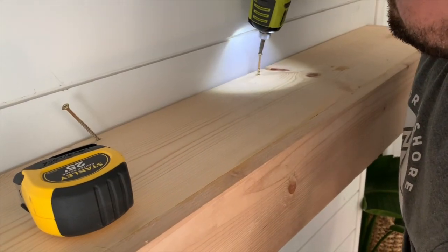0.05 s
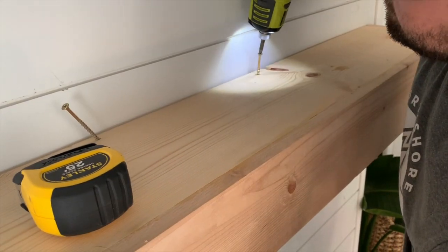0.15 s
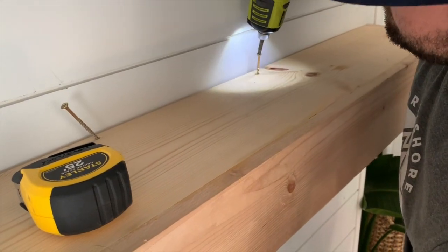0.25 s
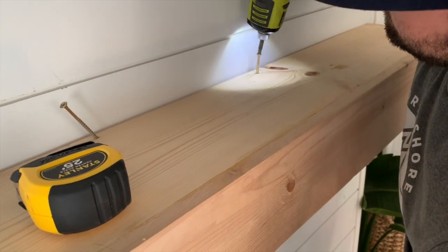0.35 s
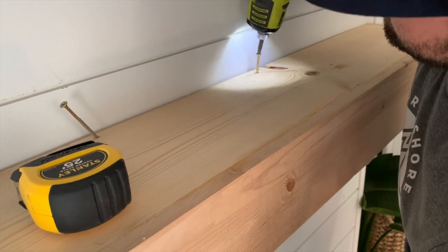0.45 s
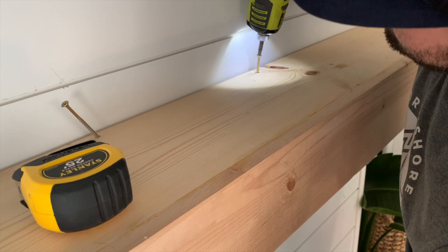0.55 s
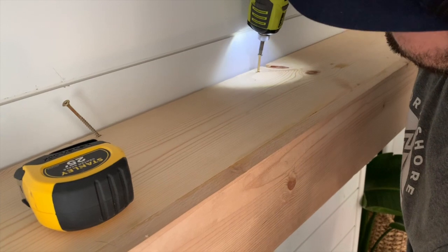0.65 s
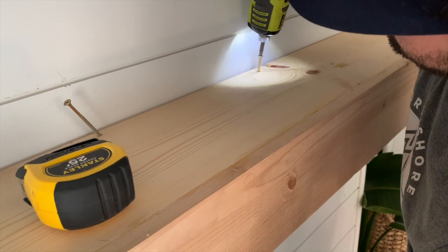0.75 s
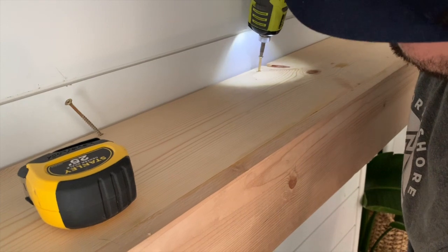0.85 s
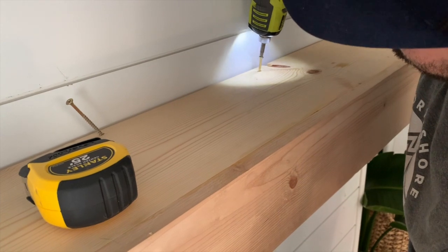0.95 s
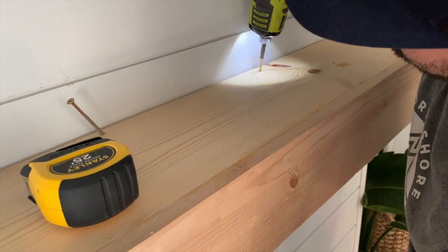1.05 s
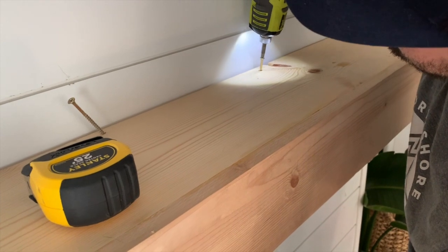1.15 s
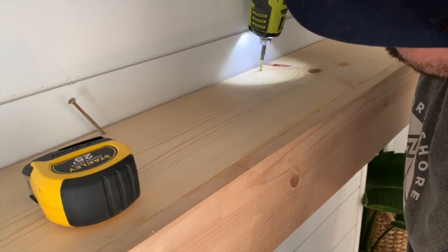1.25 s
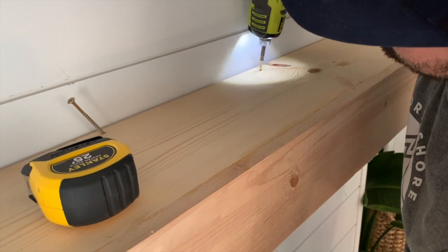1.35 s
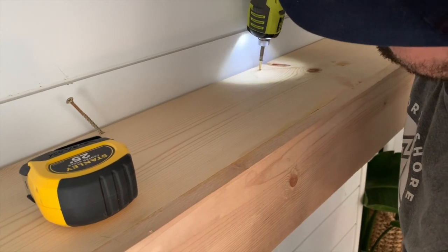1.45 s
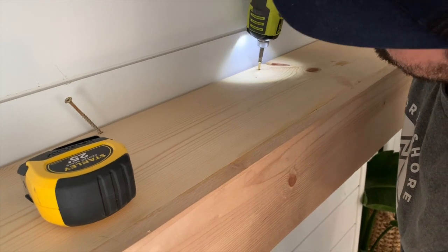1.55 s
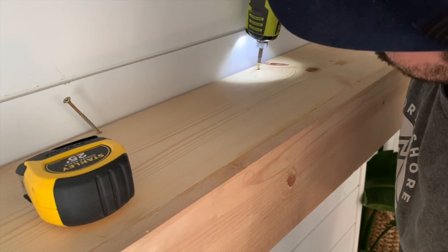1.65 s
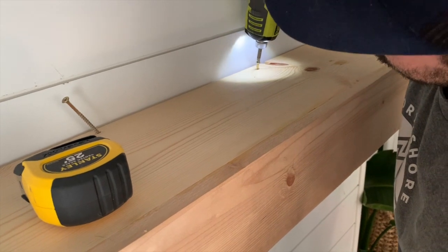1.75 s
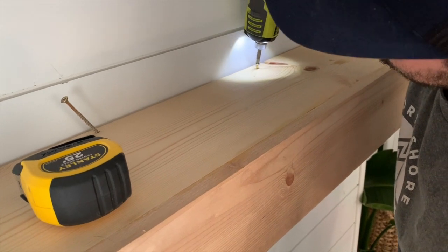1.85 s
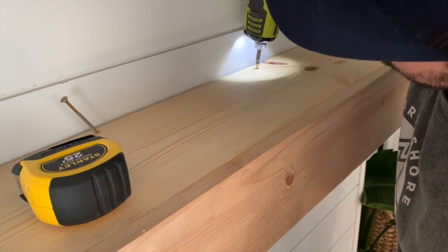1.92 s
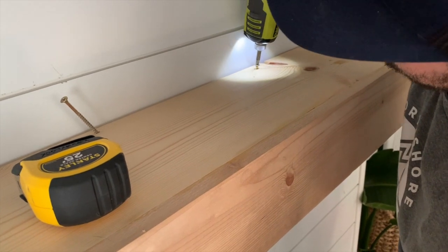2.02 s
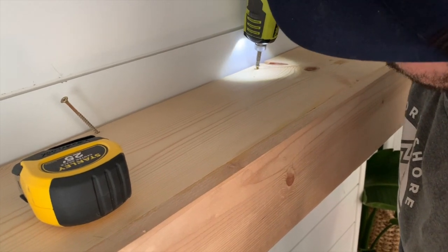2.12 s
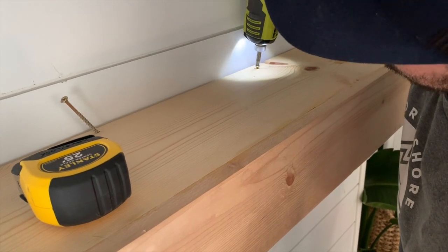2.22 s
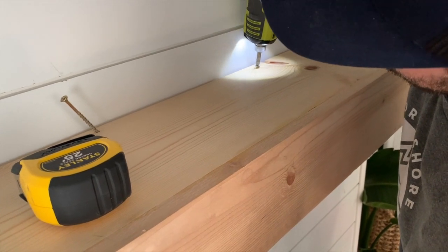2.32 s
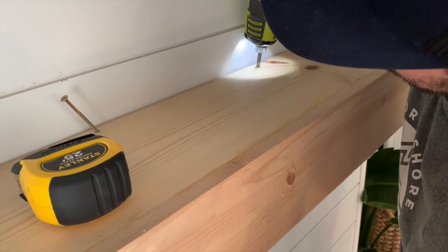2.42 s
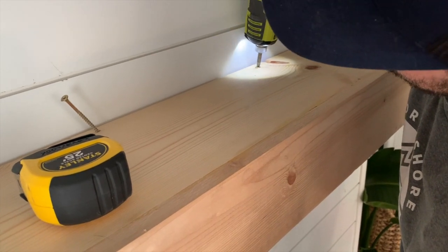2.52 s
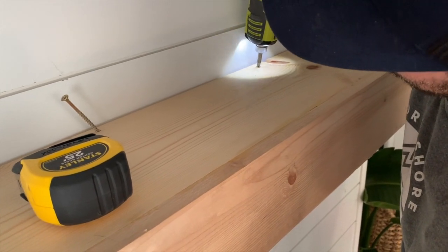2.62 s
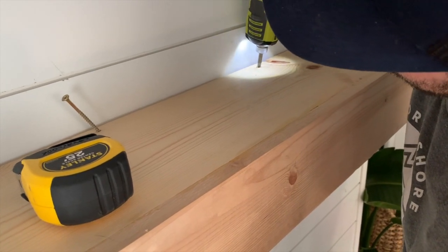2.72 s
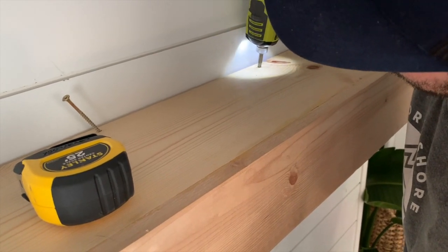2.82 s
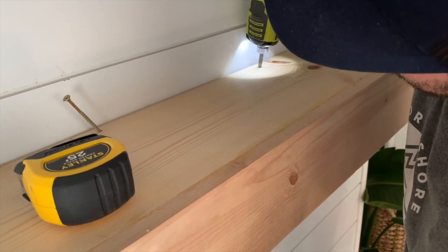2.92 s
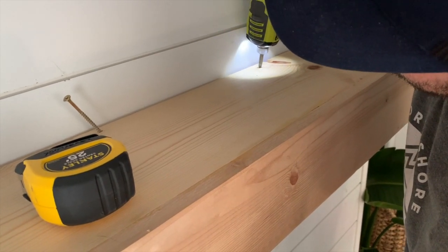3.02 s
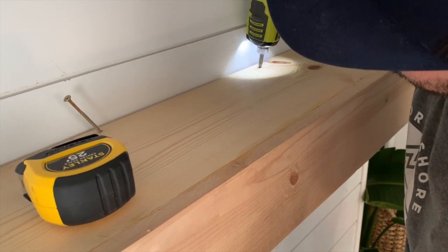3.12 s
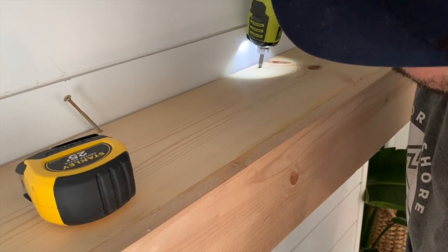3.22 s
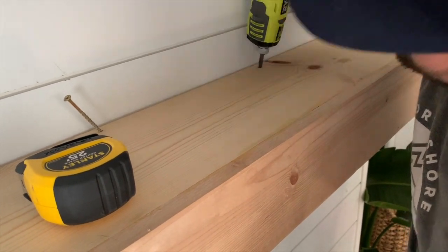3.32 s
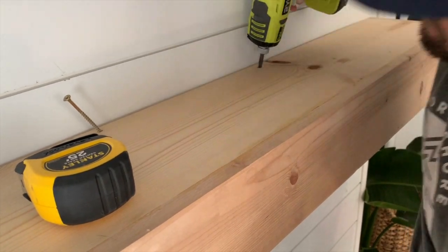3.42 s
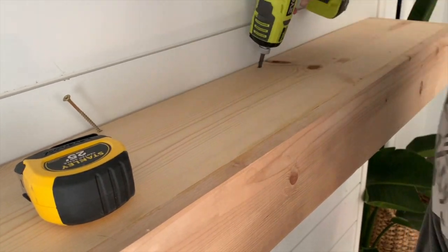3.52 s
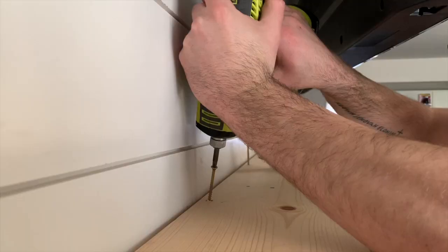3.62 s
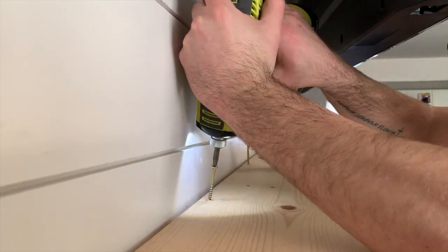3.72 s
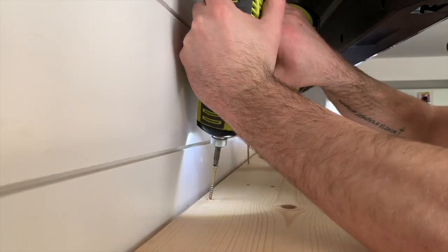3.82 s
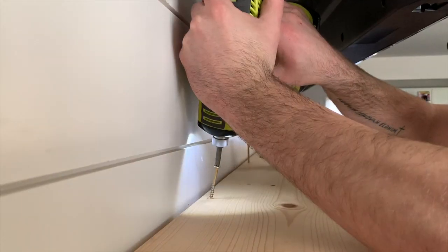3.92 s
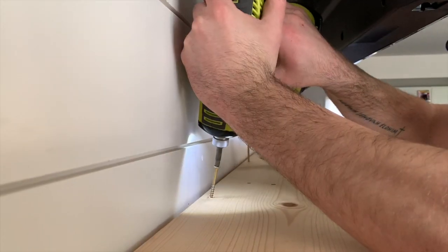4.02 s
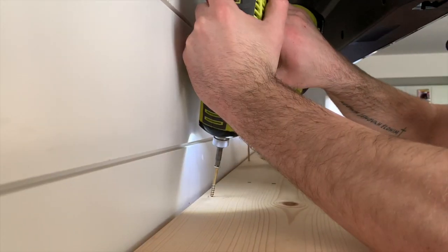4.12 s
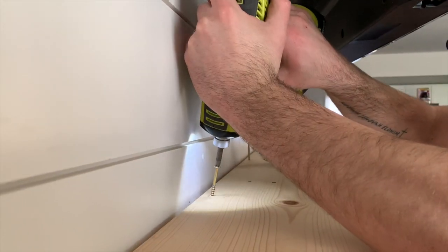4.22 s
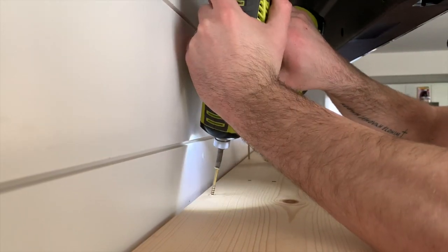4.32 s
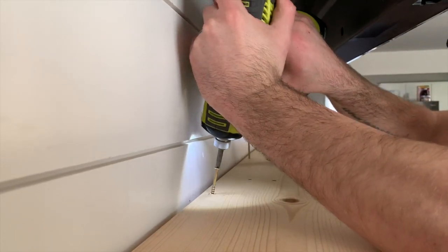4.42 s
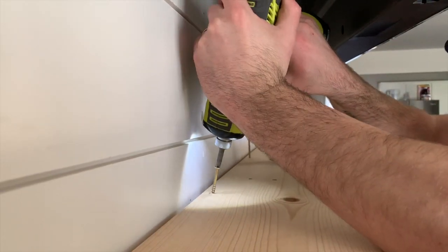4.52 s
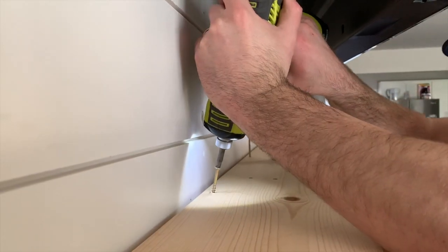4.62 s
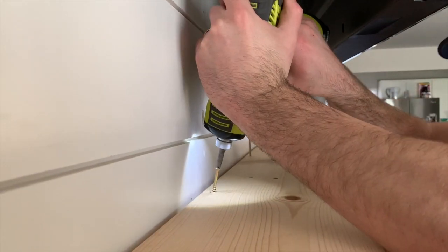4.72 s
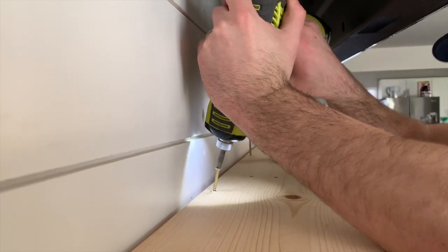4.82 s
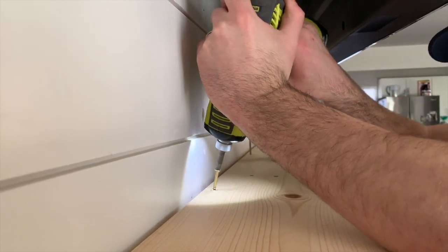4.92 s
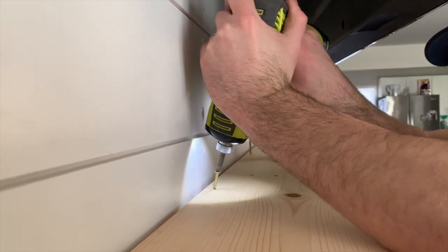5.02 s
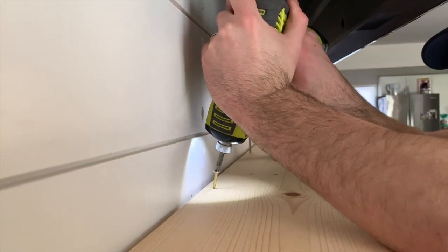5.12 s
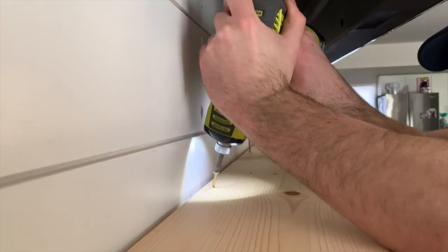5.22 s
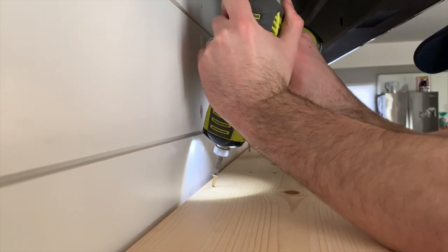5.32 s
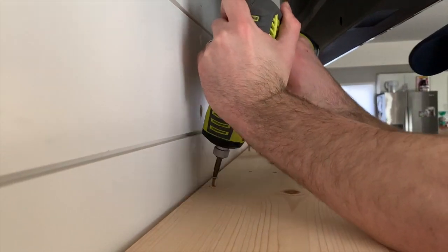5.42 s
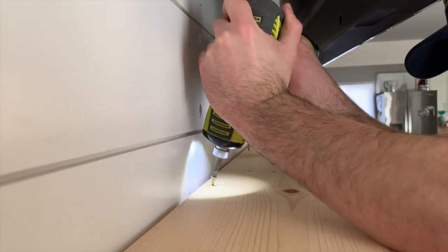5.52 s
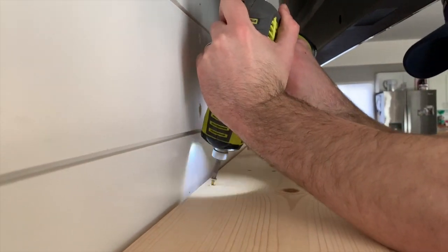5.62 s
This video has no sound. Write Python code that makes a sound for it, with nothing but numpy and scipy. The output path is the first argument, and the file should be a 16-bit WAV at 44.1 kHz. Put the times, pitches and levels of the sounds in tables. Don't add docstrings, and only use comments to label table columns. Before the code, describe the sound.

Stereo indoor recording of power-tool work on a thick shelf. First a slightly distant driver: steady gear hiss, dry woody creaking, irregular bit knocks, faint taps, then about ten hard hammer blows with dull echoing followers, louder at the end. It stops; hands and cloth brush the plank and plastic clicks. Then a nearer driver growls in separate trigger pulls, slow and labouring at first, later spinning up quickly over a low board hum.

```python
import sys
import numpy as np
from scipy import signal
from scipy.fft import rfft, irfft, next_fast_len
from scipy.io import wavfile
from scipy.ndimage import uniform_filter1d

SR = 44100
rng = np.random.default_rng(int(sys.argv[2]) if len(sys.argv) > 2 else 0)


def invert_db(x):
    u = np.asarray(x, float) / 20
    return 10 ** u


def log_audio(samples):
    frames = np.atleast_2d(samples).T
    limited = np.clip(frames, -1, 1)
    pcm = np.round(limited * 32767).astype(np.int16)
    wavfile.write(sys.argv[1], SR, pcm)


N = 249606

# start_s, motor_db, thread_bite_db
FAR_RUN = [(0.0, -34.5, -14.5), (0.3, -39.5, -28.5), (0.46, -34, -24.5), (0.53, -37.5, -19.5),
           (0.95, -39, -21.5), (1.27, -38, -30), (1.8, -35.5, -27), (2.0, -36, -27.5), (2.2, -35, -27.5),
           (2.4, -35.5, -25), (2.55, -36, -29.5), (2.7, -36, -25.5), (2.9, -34.5, -28), (3.05, -37.5, -14),
           (3.16, -41.5, -19.5), (3.26, -52, -21)]
# on_s, load_s, off_s, idle_db, loaded_db
WHINE = [
    (3.675, 3.83, 4.05, -57, -52),
    (4.38, 4.525, 4.88, -52, -42),
    (5.09, 5.14, 5.17, -53, -48),
]
# start_s, peak_db, ring_hz, ring_db, length_s
CLICKS = [(3.312, -42.5, 11500, -13, .004), (3.575, -56, 3800, -14, 0.0092),
          (3.594, -46.5, 10500, -8, 0.068), (3.633, -60, 7670, 4, .025), (3.665, -56, 2500, -15, .006),
          (3.697, -46, 1500, -14, 0.018), (3.715, -51.5, 1700, -18, .012), (3.781, -56, 3720, -7, .008),
          (3.797, -54, 2000, -10, .01), (3.805, -64, 3700, 0, 0.018), (3.844, -38, 2400, -20, .006),
          (4.523, -37.5, 2110, -22, .004), (5.138, -24, 3260, -17, 0.005),
          (5.489, -17.5, 2900, -13, 0.0074)]
# mode_hz, level_db, t60_s
BOARD = [(49.6, -1.5, 0.15), (78.4, -2, 0.24), (96.3, -0.5, 0.15), (171.3, 4, 0.1), (227.2, -3.5, 0.38),
         (268.3, 3, 0.064), (359, 3.5, 0.031), (459.8, -2, 0.045), (474.8, -3.5, 0.053),
         (561.7, -16, 0.076), (712.5, -14.5, 0.04), (892, -11, 0.015), (1108, -26, 0.12),
         (1286, -14.5, 0.028)]
# mode_hz, level_db, t60_s
STEEL = [(1750, -15, 0.013), (2489, 0.5, 0.015), (2381, -8.5, 0.046), (3780, -18, 0.0031),
         (6840, 12, 0.0028)]
# freq_hz, density_db
FAR_HISS = [(300, -10.5), (600, 0), (1500, -11), (2800, -27.5), (3200, -7.5), (5000, -8.5), (7000, -3.5),
            (9000, -2.5), (12000, -6.5), (15700, -7), (15900, -79.5)]
NEAR_HISS = [(250, -44), (450, -43), (1500, -8.5), (2600, -4.5), (3500, 1.5), (5000, -6), (7500, -1.5),
             (10000, -6.5), (13000, -7), (15700, -9), (15900, -72)]
# peak_hz, width_hz, level_db
FAR_HOUSING = [(2565, 200, 7.5), (3740, 120, -8.5), (4440, 140, -6), (5270, 110, -5.5), (6220, 250, -1.5),
               (7030, 110, -5)]
NEAR_HOUSING = [(700, 280, 17.5), (1003, 45, 8), (1390, 18, -5), (1810, 15, -9.5), (2020, 265, 16.5),
                (2765, 67, 2), (3720, 14, -14), (4400, 84, 2.5), (7010, 44, 7)]
# freq_hz, density_db
AIR = [(18, -27), (30, 8.5), (229, -6.5), (497, -39.5), (1500, -41), (3260, -39.5), (5500, -43),
       (7270, -48), (8660, -54), (10600, -46.5), (12000, -58), (15600, -92), (22000, -120)]
# freq_hz, t60_s
ROOM_T60 = [(60, 0.98), (300, 0.22), (1500, 0.49), (6000, 0.17), (14000, 0.16)]
# freq_hz, level_db
WALL_DB = [(60, -11), (300, -5), (1200, 6.5), (4000, 2), (7000, -0.5), (15000, -9)]
# freq_hz, lean_db
FAR_LEAN = [(60, -0.5), (150, 0), (380, 3), (950, 6), (2380, 1.5), (5980, -5), (15000, 3.5)]
NEAR_LEAN = [(60, 12.5), (150, -2.5), (380, 9.5), (950, 4), (2380, 3.5), (5980, -2.5), (15000, 3.5)]
# freq_hz, lead_rad
PORT_LEAD = [(0, 0), (700, .9), (5900, 1.4), (8450, -3.14), (15800, -12.57), (22050, -20.6)]
# start_s, rustle_db, bumps_db
HANDLING = [(3.24, -43, -32), (3.3, -43, -38), (3.41, -48, -30.5), (3.48, -60.5, -59), (3.6, -72, -55),
            (3.68, -67, -54), (3.7, -62, -42), (3.716, -60, -34), (3.74, -75, -37), (3.775, -75.5, -55),
            (3.79, -68, -55), (3.84, -82, -60)]
# low_hz, high_hz
SUM_GAPS = [(8250, 9050), (12700, 14200)]
DIFFERENCE_GAPS = [(10350, 11850), (15100, 17000)]
HARD_BLOWS_S = [.075, .16, .915, 1.208, 2.595, 3.103, 3.203, 4.41, 5.13]
DRY_WOOD_S = (1.1, 1.4, 2.4, 2.801)
# start_s, mesh_aim_hz, current_db (-84 or less: let go)
TRIGGER = [(3.846, 239.6, -5.5), (3.964, 250.1, -2.5), (4.075, 222.4, -9), (4.166, 300.2, -2),
           (4.215, 347, 3.5), (4.295, 445, 1), (4.375, 199.1, -90), (4.54, 222.3, -4), (4.64, 242.2, -2.5),
           (4.73, 220.9, -2.5), (4.815, 573.7, 3), (5.036, 248, -102), (5.135, 349, 2.5), (5.175, 680.4, 3),
           (5.343, 617.5, 1), (5.4, 247.5, -90), (5.488, 347.5, 8), (5.503, 700, 3), (5.61, 525, -84)]
# start_s, peak_db, crack_db
SLIPS = [(0.074, 5, -8), (0.197, -10.5, -44.5), (0.267, -12.5, -24), (0.366, -20, -42), (0.481, -16.5, -10),
         (0.577, 2.5, -14.5), (0.745, 1.5, -9.5), (0.821, -27, -37), (0.917, 2.5, -10), (0.985, -16.5, -24),
         (1.14, -18, -18.5), (1.21, 6.5, -8.5), (5.013, -12.5, -36.5), (5.599, -8.5, -22),
         (5.627, -6.5, -19.5)]
# start_s, peak_db
TAPS = [(1.313, -21), (1.398, -36), (1.459, -33), (1.562, -17), (1.622, -30), (1.695, -39), (1.773, -15),
        (1.889, -20), (1.944, -43), (2.049, -12.5), (2.104, -18)]
# start_s, peak_db, crack_db, follower_lag_s, follower_db
BLOWS = [(2.237, -9.5, -19, 0.055, -6), (2.362, -10.5, -17.5, 0.055, -7), (2.491, -10, -25, .030, -5.5),
         (2.594, -3, -13.5, .036, -4.5), (2.705, -7, -13.5, 0.031, -5.5), (2.814, -2.5, -18, 0.027, -15),
         (2.901, -2, -17.5, 0.015, -25), (3.006, 5.5, -5.5, 0.019, -21), (3.104, 4, -4, 0.011, -32.5),
         (3.204, -2.5, -11.5, 0.0063, -43)]
# start_s, peak_db, crack_db
TICKS = [(1.8, -26, -29.5), (1.856, -41, -28), (2.4, -12, -27.5), (2.014, -26, -32.5), (2.088, -10.5, -36),
         (2.4, -16.5, -34), (2.199, -14, -35), (1.4, -14, -39), (2.335, -6, -32), (1.9, -4.5, -38),
         (1.9, -14.5, -22.5), (3, -21, -35), (0.68, -15, -24), (1.1, -22.5, -19.5), (2.3, -10, -28),
         (2.3, -13, -25), (2.5, -13, -18), (2.83, -9.5, -29), (0.06, -5, -28), (2.925, -11, -29),
         (4.2, -19, -31), (2.98, -12.5, -23), (2.993, -8, -35), (0.48, 1, -12)]
# mesh_multiple, level_db
MESH_ORDERS = [(1, -13), (2, 3), (3, -2), (4, -3), (5, -5), (6, -3), (7, -10), (8, -9)]
# freq_hz, lift_db
SHELL_LIFT = [(300, -3), (560, -2), (720, 5), (830, -1), (950, 6), (1250, 1), (1700, 4), (2200, 2),
              (2900, -8), (4100, 2)]
# mesh_multiple, level_db against the motor
FAR_WHISTLES = [(4, -15), (5, -17), (8, -16), (9, -13)]
WHISTLE_S = (1.3, 1.5, 2.3, 2.5)

FAR_MESH_HZ, FAR_MESH_DB, FAR_MESH_DB_PER_S = 284.3, -1.5, -7
MESH_WANDER_DB, WHISTLE_LIFT_DB = 1.5, 6
DRY_WOOD_DB, SOFT_WOOD_DB = 22, -2
CAM_SWING, CAM_LAG_S = .06, .005

TAP_CRACK_DB, FOLLOWER_CRACK_DB, REBOUND_S = -25.5, -45, .0095
SNAP_DB, SNAP_FOLLOWS, SEATED_S, SEATED_SNAP_DB = -41.5, 0.96, 3.05, 7.5
THUD_T60_S, THUD_KNEE_HZ, THUD_DAMPING = 0.15, 393, 1.2
SEATED_HARD_DB, HARD_FROM_S = 3.5, 2.85
BURIED_S, BURIED_DB = 2.2, -7
RATTLE_SHARE, BODY_DB = 0.21, 15
SECOND_SCREW_S = 3.6

SLOW_HZ, SPIN_S = 240, .025
PULL_S, CURRENT_S = 0.015, 0.017
HISS_DB, HISS_DB_PER_OCT = -30.5, 4
MESH_DB, MESH_DB_PER_OCT = -18.5, -11
ORDERS_DB, ORDERS_DB_PER_OCT = -41, 5
THREAD_DB, THREAD_DB_PER_S, THREAD_DB_PER_OCT = -46.5, 9.5, 2
SWEEP_LOSS_DB = 1.5
IDLE_HZ, LOADED_HZ, SAG_S, OCTAVE_DB = 7165, 6930, .03, -10

HUM_DB, HUM_HZ, MESH_PER_SHAKE, HUM_IDLE_DB = -20, 57, 9.8, -43
HUM_FROM_HZ, HUM_DB_PER_OCT, PAST_DB_PER_OCT, HUM_RING_S = 516, 78, -19.5, 0.024
SHAKE_WANDER_DB = 3.5

AIR_DB, NEAR_ROOM_DB = -38, -17
GAP_SHRINK_HZ, GAP_FLICKER_PER_S = 220, 9


def rms_one(x):
    return x / np.sqrt(np.mean(x ** 2) + 1e-20)


def in_time(rows, fade=0.0093):
    s, *columns = np.transpose(rows)
    t = np.arange(N) / SR
    gate = np.clip(np.minimum(t - s[0] + fade, s[-1] + fade - t) / fade, 0, 1)
    return [gate] + [np.interp(t, s, c) for c in columns]


def at_hz(points, hz):
    point_hz, point_value = np.transpose(points)
    return np.interp(np.log(hz + 1), np.log(point_hz), point_value)


def colour(x, spectrum):
    gain = invert_db(at_hz(spectrum, np.fft.rfftfreq(N, 1 / SR)))
    return rms_one(irfft(rfft(x) * gain, N))


def drift(rate):
    r = np.exp(-64 * np.pi * rate / SR)
    noise = rng.standard_normal(N // 32 + 2002)
    slow = signal.lfilter([1], [1, -2 * r, r * r], noise)[2000:]
    return np.interp(np.arange(N) / 32, np.arange(len(slow)), rms_one(slow))


def lagged(x, lag_s):
    r = np.exp(-1 / (lag_s * SR))
    return x[0] + signal.lfilter([(1 - r) ** 2], [1, -2 * r, r * r], x - x[0])


def ring(x, hz, t60):
    r, w = 10 ** (-3 / (t60 * SR)), 2 * np.pi * hz / SR
    return signal.lfilter([0, np.sin(w)], [1, -2 * r * np.cos(w), r * r], x + 1e-18)


def tone(hz, wobble):
    return np.sqrt(2) * np.sin(2 * np.pi * np.cumsum(hz * (1 + wobble * drift(23.2))) / SR)


def grains(per_s, spread_db):
    hits = rng.random(N) < per_s / SR
    size = invert_db(spread_db * np.minimum(rng.exponential(1, N), 4))
    return hits * size * rng.choice([-1, 1], N)


def jolts(at_s, level_db, length_s, rise_s):
    t, out = np.arange(SR // 5) / SR, np.zeros(N + SR)
    for s, db, length in zip(at_s, level_db, length_s):
        shape = (1 - np.exp(-t / rise_s)) * np.exp(-(t / max(length, .002)) ** 2)
        start = round(s * SR)
        out[start:start + len(t)] += invert_db(db) * shape / np.sqrt(length)
    return out[:N]


def housing(x, peaks, widen, peak_db, patchy_db):
    lifted = 0
    for hz, width, db in peaks:
        grip = invert_db(db + patchy_db * drift(8.2))
        lifted = lifted + grip * rms_one(ring(x, hz, 2.13 / (width * widen)))
    return rms_one(lifted) * invert_db(peak_db)


def board(force):
    return sum((-1) ** k * invert_db(db) * ring(force, hz, t60) for k, (hz, db, t60) in enumerate(BOARD))


def gears(spectrum, peaks, flutter_db, peak_db):
    teeth = rng.standard_normal(N) + .5 * grains(per_s=1300, spread_db=3.5)
    teeth = teeth * invert_db(flutter_db * (drift(27.0) + 0.089 * drift(76)))
    shell = housing(teeth, peaks, widen=2.66, peak_db=peak_db, patchy_db=1.5)
    return rms_one(colour(teeth, spectrum) + shell)


def cam():
    first_slips = SLIPS[:12]
    s = np.sort([row[0] for row in first_slips + TAPS + BLOWS])
    turns = np.interp(np.arange(N) / SR - CAM_LAG_S, s, np.arange(len(s)))
    return 1 - CAM_SWING * np.cos(2 * np.pi * turns) + 0.017 * drift(5)


def whistles(mesh_hz):
    lift_db = np.interp(np.arange(N) / SR, WHISTLE_S, [0, WHISTLE_LIFT_DB, WHISTLE_LIFT_DB, 0])
    out = 0
    for k, db in FAR_WHISTLES:
        out = out + invert_db(db + lift_db + 4 * drift(18)) * tone(k * mesh_hz, wobble=.008)
    return out


def mesh(hz, peaks, waver, rough):
    turns = np.cumsum(hz * (1 + waver * drift(60))) / SR
    uneven = invert_db(2.5 * drift(40) + rng.normal(0, 2.5, N))
    pushes = rms_one(np.diff(np.floor(turns), prepend=0) * uneven)
    pushes = pushes + rough * rms_one(grains(per_s=1400, spread_db=-0.5))
    low = signal.lfilter([.12], [1, -.78], pushes - np.mean(pushes))
    shell = housing(pushes, peaks, widen=2.5, peak_db=0, patchy_db=2.5)
    return rms_one(invert_db(-21) * rms_one(low) + shell)


def creak(bright_db):
    slips = grains(per_s=500, spread_db=2) * invert_db(2 * drift(12))
    soft = signal.lfilter([.06], [1, -.94], slips)
    return rms_one(board(soft + 0.086 * invert_db(bright_db) * slips))


def first_screw():
    gate, motor_db, bite_db = in_time(FAR_RUN)
    t = np.arange(N) / SR
    bright_db = np.interp(t, DRY_WOOD_S, [SOFT_WOOD_DB, DRY_WOOD_DB, DRY_WOOD_DB, SOFT_WOOD_DB])
    far = invert_db(motor_db + 6.5) * gears(FAR_HISS, FAR_HOUSING, flutter_db=1.5, peak_db=-6.0)
    mesh_hz = FAR_MESH_HZ * cam()
    far = far + invert_db(motor_db) * whistles(mesh_hz)
    mesh_db = motor_db + FAR_MESH_DB + FAR_MESH_DB_PER_S * t + MESH_WANDER_DB * drift(7.2)
    far = far + invert_db(mesh_db) * mesh(mesh_hz, FAR_HOUSING, waver=.008, rough=0.093)
    return gate * (far + invert_db(bite_db + 0.5) * creak(bright_db))


def contacts():
    rows = SLIPS + TICKS + [(s, db, TAP_CRACK_DB) for s, db in TAPS] + [row[:3] for row in BLOWS]
    rows += [(s + lag, db, FOLLOWER_CRACK_DB) for s, _, _, lag, db in BLOWS]
    s, peak_db, crack_db = np.transpose(rows)
    snap_db = SNAP_DB + SNAP_FOLLOWS * (crack_db + 14.5) + SEATED_SNAP_DB * (s > SEATED_S) - crack_db
    snap_db = np.where(crack_db < -30, -22, snap_db)
    return s, peak_db, crack_db, snap_db, np.full(len(s), REBOUND_S)


def thuds(s, peak_db, rebound_s):
    thud = 0
    for k, (hz, db, t60) in enumerate(BOARD[3:]):
        force, luck_db = np.zeros(N + SR), rng.normal(0, 1.5, (len(s), 3))
        arrival_s = s + .045 / np.sqrt(hz)
        hard = (s > HARD_FROM_S) * (s < SECOND_SCREW_S) * (hz > THUD_KNEE_HZ)
        for bounce in range(3):
            at = np.round((arrival_s + bounce * rebound_s) * SR).astype(int)
            force[at] += invert_db(peak_db - 2.5 * bounce + luck_db[:, bounce] + SEATED_HARD_DB * hard)
        blow_t60 = THUD_T60_S * min(1, THUD_KNEE_HZ / hz) ** THUD_DAMPING
        thud = thud + (-1) ** k * invert_db(db - 12.5) * ring(force[:N], hz, blow_t60)
    return thud


def knocks():
    s, peak_db, crack_db, snap_db, rebound_s = contacts()
    thud = thuds(s, peak_db, rebound_s)
    noise = rng.standard_normal((2, N))
    shank = np.cos(2 * np.pi * STEEL[1][0] * np.arange(N) / SR)
    rattle = jolts(s - .002, crack_db - 42.5, 0.31 * rebound_s, rise_s=0.0021)
    rattle = rattle * (noise[0] * RATTLE_SHARE + shank)
    bare = rattle * invert_db(BURIED_DB * (np.arange(N) > BURIED_S * SR))
    steel = sum(invert_db(db - 9.5) * ring(bare, hz, t60) for hz, db, t60 in STEEL)
    shudder = jolts(s - .002, crack_db - 31.5, 1.7 * rebound_s, rise_s=0.0016) * noise[0]
    body = signal.sosfilt(signal.butter(2, [400, 2300], "band", fs=SR, output="sos"), shudder)
    snap = jolts(s - .002, crack_db + snap_db - 8.5, 0.097 * rebound_s, rise_s=0.00027) * noise[1]
    snap = signal.sosfilt(signal.butter(2, 3000, "high", fs=SR, output="sos"), snap)
    return thud + steel + invert_db(BODY_DB) * body + snap


def handling():
    gate, rustle_db, bumps_db = in_time(HANDLING)
    brushing = rng.standard_normal(N) * invert_db(1.9 * drift(40))
    rustle = colour(brushing, [(300, 9.0), (900, -4), (4000, -20), (8000, -31), (12000, -28), (16000, -39.5)])
    return gate * (invert_db(rustle_db + 7.5) * rustle + invert_db(bumps_db - 7.0) * creak(bright_db=-2))


def clicks():
    spectrum = [(300, 17.5), (1000, 3.0), (5000, -1.5), (12000, -5.5), (16000, -19)]
    out, noise = 0, colour(rng.standard_normal(N), spectrum)
    for s, db, hz, ring_db, length in CLICKS:
        tick = jolts([s], [db - 27], [length], rise_s=.0004) * noise
        out = out + tick + invert_db(ring_db) * ring(tick, hz, 0.008)
    return out


def whine():
    out = 0
    for on, load, off, idle_db, loaded_db in WHINE:
        gate, hz, db = in_time([(on, IDLE_HZ, idle_db), (load - SAG_S / 2, IDLE_HZ, idle_db),
                                (load + SAG_S / 2, LOADED_HZ, loaded_db), (off, LOADED_HZ, loaded_db)])
        pair = tone(hz, wobble=0.00078) + invert_db(OCTAVE_DB) * tone(2 * hz, wobble=0.00054)
        out = out + gate * invert_db(db) * pair
    return out


def motor():
    s, aim_hz, current_db = np.transpose([(0, 200, -91.0)] + TRIGGER)
    step = np.searchsorted(s, np.arange(N) / SR, side="right") - 1
    current = invert_db(current_db[step])
    load = np.maximum(lagged(current, PULL_S), lagged(current, CURRENT_S))
    return lagged(aim_hz[step], SPIN_S), load


def gear_tones(mesh_hz):
    phase = 2 * np.pi * np.cumsum(mesh_hz * (1 + .009 * drift(30))) / SR
    sweep_oct_per_s = np.abs(np.gradient(np.log2(mesh_hz))) * SR
    steady_db = -np.minimum(SWEEP_LOSS_DB * sweep_oct_per_s, 5)
    out = 0
    for k, db in MESH_ORDERS:
        level_db = db + steady_db + at_hz(SHELL_LIFT, k * mesh_hz) + 3 * drift(20)
        out = out + invert_db(level_db) * np.sin(k * phase + k * k)
    return out


def second_screw():
    mesh_hz, load = motor()
    octaves = np.log2(mesh_hz / SLOW_HZ)
    hiss = gears(NEAR_HISS, NEAR_HOUSING, flutter_db=1.84, peak_db=-4.5)
    near = invert_db(HISS_DB + HISS_DB_PER_OCT * octaves) * hiss
    mesh_db = MESH_DB + MESH_DB_PER_OCT * octaves
    near = near + invert_db(mesh_db - 7) * mesh(mesh_hz, NEAR_HOUSING, waver=.018, rough=1.1)
    near = near + invert_db(ORDERS_DB + ORDERS_DB_PER_OCT * octaves) * gear_tones(mesh_hz)
    growl = housing(grains(per_s=1700, spread_db=-1.0), NEAR_HOUSING[:2], widen=0.89, peak_db=-16.0,
                    patchy_db=-1.5)
    near = near + invert_db(mesh_db) * (SLOW_HZ / mesh_hz) ** 0.26 * growl
    thread_db = THREAD_DB + THREAD_DB_PER_S * (np.arange(N) / SR - 4) + THREAD_DB_PER_OCT * octaves
    return load * (near + invert_db(thread_db) * creak(bright_db=0))


def hum():
    mesh_hz, load = motor()
    beyond = np.log2(mesh_hz / SLOW_HZ) - np.log2(HUM_FROM_HZ / SLOW_HZ)
    shake = load * invert_db(HUM_DB + np.minimum(HUM_DB_PER_OCT * beyond, PAST_DB_PER_OCT * beyond))
    level = lagged(shake, HUM_RING_S) + invert_db(HUM_IDLE_DB) * lagged(load, 0.13)
    hum_hz = np.maximum(HUM_HZ, lagged(mesh_hz, 0.035) / MESH_PER_SHAKE)
    return level * invert_db(SHAKE_WANDER_DB * drift(19)) * tone(hum_hz, wobble=0.019)


def scatter(x):
    hop = SR // 10
    t = np.arange(SR // 20) / SR
    window = np.sin(np.pi * np.arange(2 * hop) / (2 * hop))
    out, padded = np.zeros((2, N + 4 * hop)), np.pad(x, (hop, 2 * hop))
    for i in range(0, N + hop, hop):
        echo = rng.standard_normal((2, len(t))) * np.exp(-t / 0.013)
        echo = echo / np.linalg.norm(echo[0])
        piece = signal.fftconvolve((padded[i:i + 2 * hop] * window)[None], echo, axes=1)
        out[:, i:i + piece.shape[1]] += piece
    return out[:, hop:hop + N]


def room_tail():
    t = np.arange(SR) / SR
    tail, white = 0, rng.standard_normal((2, SR))
    for centre in 45 * 2.0 ** np.arange(9):
        octave = signal.butter(2, [centre / 1.41, centre * 1.41], "band", fs=SR, output="sos")
        band = signal.sosfilt(octave, white)
        alike = np.clip(1.1 - centre / 900, 0, 1)
        decay = invert_db(-60 * t / at_hz(ROOM_T60, centre))
        tail = tail + (alike * band[0] + (1 - alike) * band) * decay
    return tail * np.minimum(t / 0.0047, 1) / np.linalg.norm(tail[0])


def heard(x, lean, wall_db, room_db):
    size = next_fast_len(N + SR)
    hz = np.fft.rfftfreq(size, 1 / SR)
    lead = np.interp(hz, *np.transpose(PORT_LEAD)) / 2
    nearby = rfft(scatter(x), size) * invert_db(at_hz(WALL_DB, hz) + wall_db)
    tail = rfft(room_tail(), size) * invert_db(room_db)
    paths = np.exp(1j * lead * [[1], [-1]]) + tail
    balance = invert_db(at_hz(lean, hz) / 2 * [[1], [-1]])
    return irfft((rfft(x, size) * paths + nearby) * balance, size)[:, :N]


def without(parts, shrink_hz):
    hz = np.fft.rfftfreq(N, 1 / SR)
    cut = []
    for part, gaps in zip(parts, (SUM_GAPS, DIFFERENCE_GAPS)):
        loss_db = 0
        for low, high in gaps:
            low, high = low + shrink_hz, high - shrink_hz
            loss_db = loss_db + np.interp(hz, [low - 150, low + 50, high - 50, high + 150], [0, -70, -70, 0])
        cut.append(part * invert_db(loss_db))
    both, apart = cut
    return irfft([both + apart, both - apart], N)


def thinned(x):
    left, right = rfft(x)
    parts = (left + right) / 2, (left - right) / 2
    wide, narrow = without(parts, -GAP_SHRINK_HZ / 3), without(parts, GAP_SHRINK_HZ)
    thin = wide + np.clip(4 * drift(GAP_FLICKER_PER_S), 0, 1) * (narrow - wide)
    filled, t = np.zeros(N), np.arange(N) / SR
    for s in HARD_BLOWS_S:
        filled += np.clip(2 - np.abs(t - s) / .012, 0, 1)
    return thin + filled * (x - thin)


def scene():
    blows, first = knocks(), np.arange(N) < SECOND_SCREW_S * SR
    far = first_screw() + blows * first + handling()
    near = second_screw() + blows * ~first + clicks()
    air = invert_db(AIR_DB - 9.0) * colour(rng.standard_normal(N), AIR)
    work = heard(far + air, FAR_LEAN, wall_db=-2.0, room_db=-15.0)
    work = work + heard(near, NEAR_LEAN, wall_db=-1.88, room_db=NEAR_ROOM_DB)
    return thinned(work) + hum() + heard(whine(), NEAR_LEAN, wall_db=0.0, room_db=-39)


def band_limit(x):
    return signal.sosfilt(signal.butter(12, 17000, fs=SR, output="sos"), x)


def record(dry):
    dry = signal.sosfilt(signal.butter(4, 38, "high", fs=SR, output="sos"), dry)
    fall_db = 250 * np.arange(N) / SR
    over_db = np.maximum(20 * np.log10(np.abs(dry).max(axis=0) + 1e-9) + 0.5, 0)
    held_db = uniform_filter1d(np.maximum.accumulate(over_db + fall_db) - fall_db, size=33)
    low_pass = signal.cheby2(12, 55, 16100, fs=SR, output="sos")
    held = signal.sosfilt(low_pass, dry * invert_db(-held_db))
    return band_limit(np.clip(held, -1, 1))


dry = scene()
out = record(dry)
log_audio(out)
```